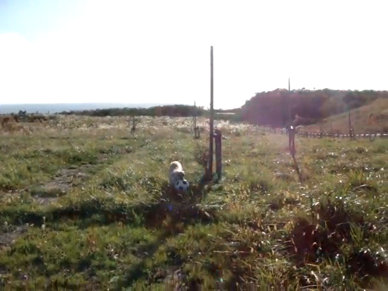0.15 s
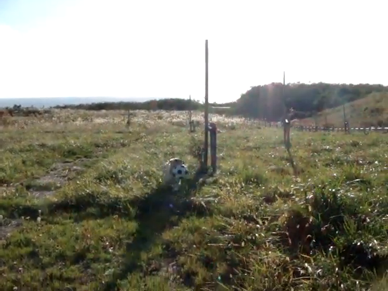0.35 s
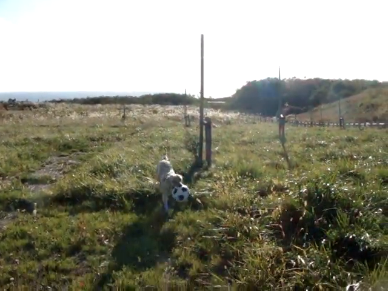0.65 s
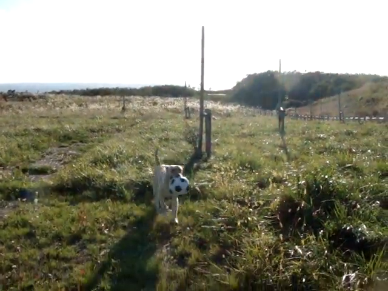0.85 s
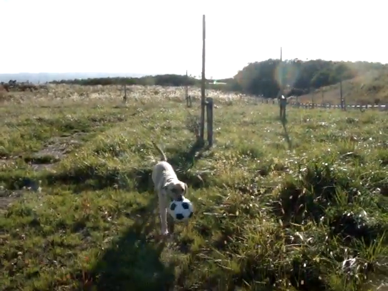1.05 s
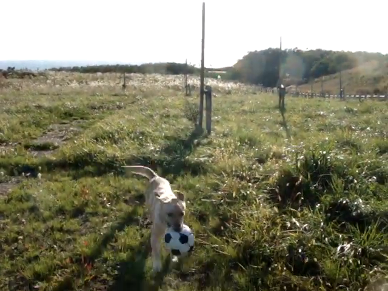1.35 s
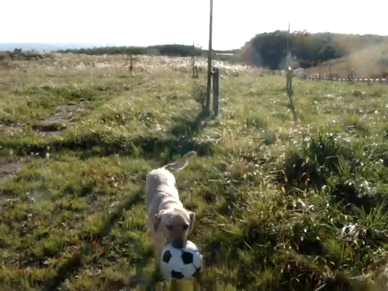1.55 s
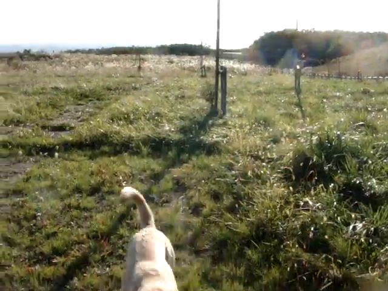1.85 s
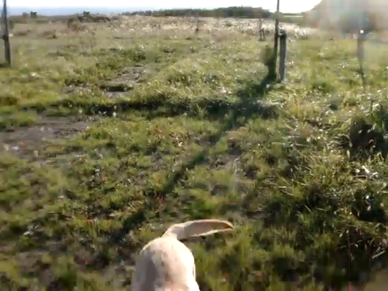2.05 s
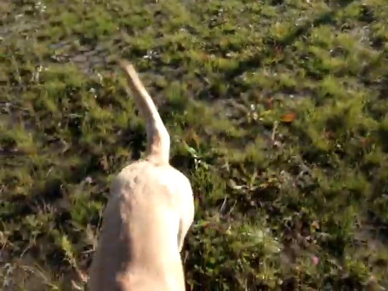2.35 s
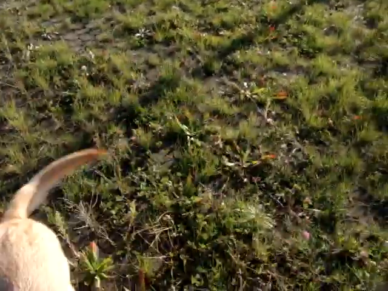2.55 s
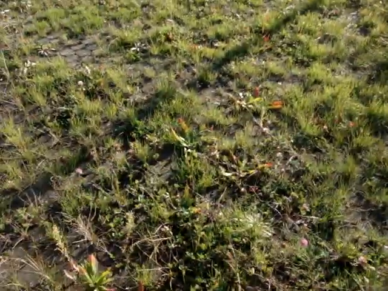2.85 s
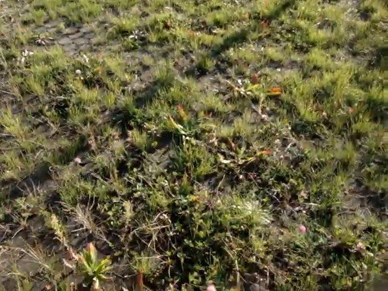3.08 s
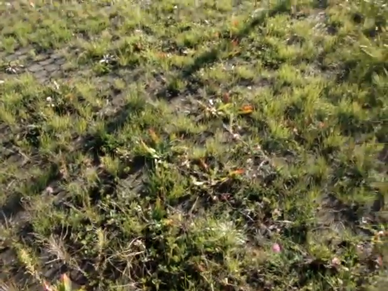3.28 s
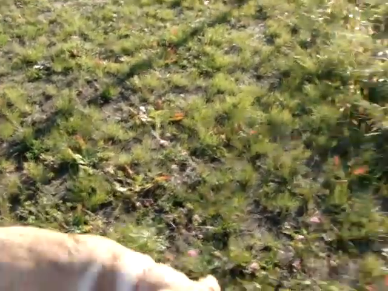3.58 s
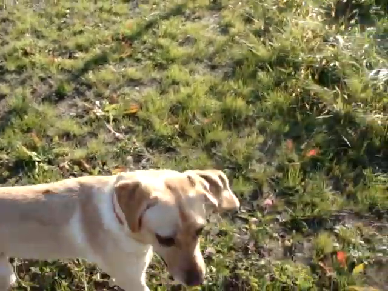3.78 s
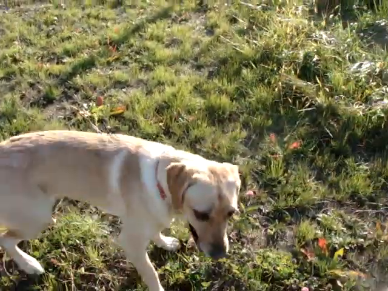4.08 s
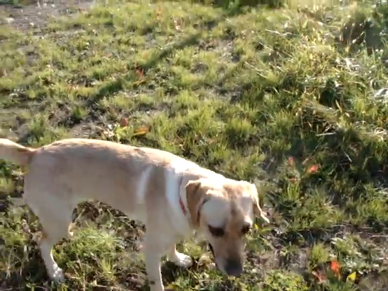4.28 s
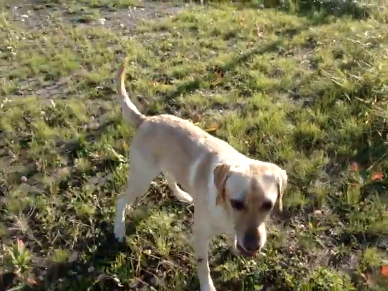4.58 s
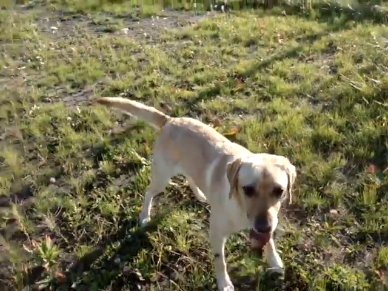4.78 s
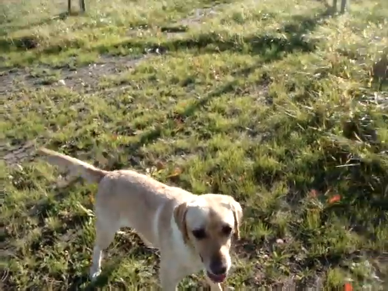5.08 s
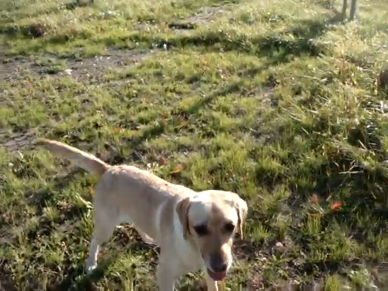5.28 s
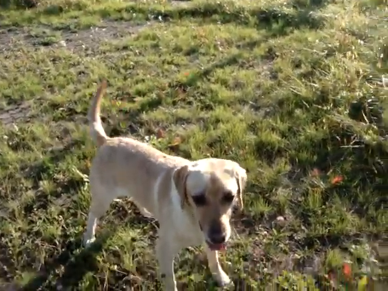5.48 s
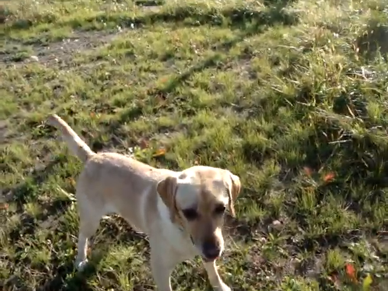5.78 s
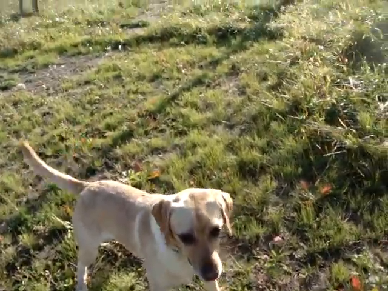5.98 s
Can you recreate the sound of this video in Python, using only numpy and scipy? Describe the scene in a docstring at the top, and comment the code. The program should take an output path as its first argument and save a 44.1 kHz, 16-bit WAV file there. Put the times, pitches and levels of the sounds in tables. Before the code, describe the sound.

Low wind buffeting opens the scene, then eases as a dog trots nearer, breathing around a ball. Its huffs turn rough and wet, with palate clicks, snorts and a fluttering sniff very close by. Dry grass rustles and crackles. Short hoarse pants follow at irregular spacing, strong then weak, between renewed gusts that rumble and finally overload the small outdoor microphone.

```python
"""A dog trots up through rough grass with a ball, passes close by, snorts and sniffs, then stands panting.
Each breath is turbulent air ringing the throat, mouth and nose, chopped unevenly by the soft palate.
Wet palate slaps and a gliding nostril whistle, made of narrow-band noise, colour the snorts and a sniff.
Gusts buffet the microphone with low rumble and pops: noise read at the pace of the wind, and short swirls.
Dry grass rustles under the paws as random ticks, stalks snap, and steady distant air lies underneath."""
import sys
import numpy as np
from scipy import signal
from scipy.fft import rfft, irfft
from scipy.io import wavfile
from scipy.ndimage import uniform_filter1d, map_coordinates

SR = 44100
rng = np.random.default_rng(int(sys.argv[2]) if len(sys.argv) > 2 else 0)


def persist_wave(psi):
    """Save psi, clipped to +-1, as 16-bit WAV."""
    counts = np.round(np.clip(psi, -1, 1) * 32767).astype(np.int16)
    wavfile.write(sys.argv[1], SR, np.atleast_2d(counts).T)


N = 270375
TIME = np.arange(N) / SR  # s
FREQ = np.fft.rfftfreq(N, 1 / SR)  # Hz
EDGE_HZ = 10130  # upper band limit


def amp(db):
    """Logarithmic level: decibels become a pressure gain."""
    return 10 ** (np.asarray(db) / 20)


def unit(x):
    """Power normalisation: scales to rms 1."""
    return x / np.sqrt(np.mean(x ** 2) + 1e-20)


def colour(points, hz):
    """Spectral shaping: gain interpolated in dB over logarithmic frequency."""
    f, db = np.transpose(points)
    return amp(np.interp(np.log(hz + 1), np.log(f), db))


def follow(rows, t):
    """Linear interpolation: reads a curve at the given times."""
    return np.interp(t, *np.transpose(rows))


def tint(x, gain):
    """Linear filtering: multiplies the spectrum by a gain for each frequency."""
    return irfft(rfft(x) * gain, len(x))


def wobble(n, rate_hz):
    """Band-limited random modulation: rms 1, up to about the given rate."""
    hz = np.fft.rfftfreq(n, 1 / SR)
    gain = hz / (hz + rate_hz / 4) / (1 + (hz / rate_hz) ** 4)
    return unit(tint(rng.standard_normal(n), gain))


def add(mix, s, sound):
    """Superposition: mixes a sound in at time s, or at the start if s is negative."""
    part = mix[max(round(s * SR), 0):][:len(sound)]
    part += sound[:len(part)]


def envelope(t, length, db, swell_db, attack, release):
    """Amplitude envelope: a soft attack, a hold that swells or sags, a soft release."""
    rise = np.clip(t / attack, 0, 1)
    fall = np.clip((length - t) / release, 0, 1)
    level_db = db + swell_db * (np.clip(t / length, 0, 1) - .5)
    return amp(level_db) * np.sin(np.pi / 2 * rise) ** 2 * np.sin(np.pi / 2 * fall) ** 2


# Spectrum of the steady air over the open field. Each row: frequency in Hz, relative density in dB per Hz.
FIELD_SPECTRUM = [(15, -41.5), (25, 1.5), (70, -1.5), (128, -3), (205, -8), (365, -11.5), (1130, -12),
                  (1530, -18), (2720, -17.5), (8600, -30.5), (10000, -75.5), (13000, -63), (22000, -120)]


def field(level_db=-43):
    """Stationary noise: steady distant air over open ground."""
    gain = colour(FIELD_SPECTRUM, FREQ) * (FREQ < EDGE_HZ)
    return amp(level_db) * unit(tint(rng.standard_normal(N), gain))


# Steady stirring of the grass. Each row: time in seconds, relative level in dB.
STIRRING = [(0, -47.5), (1.3, -55.5), (1.9, -48.5), (2.25, -61), (2.6, -47), (3.2, -50.5), (3.8, -41.5),
            (4.6, -49), (5.4, -45.5), (5.7, -56.5), (6.05, -55), (6.13, -39.5)]
# Paws and legs sweeping through the grass. Each row: start in seconds, length in seconds,
# relative level in dB, swell from start to end in dB.
SWISHES = [(0.273, 0.1, -48, -5), (0.437, 0.17, -44.5, 7), (1.423, 0.098, -51, -8), (1.842, .39, -44.5, 6),
           (2.267, 0.14, -39.5, -13), (2.452, 0.067, -40, -2), (2.794, 0.22, -41.5, 10),
           (3.059, 0.095, -39.5, -11), (3.341, 0.252, -37.5, 9.5), (4.270, 0.3, -46.5, -5),
           (4.778, 0.19, -47.5, -5), (4.923, 0.17, -37, 4), (5.362, 0.15, -50, 3)]


def stirring(attack_s=0.027, release_s=0.027):
    """Power addition: swishes add their power to the steady stirring, giving the gain of the rustle."""
    swishes = sum(envelope(TIME - start, length, db, swell_db, attack_s, release_s) ** 2
                  for start, length, db, swell_db in SWISHES)
    return np.sqrt(amp(follow(STIRRING, TIME)) ** 2 + swishes)


# Spectrum of brushing blades. Each row: frequency in Hz, relative density in dB per Hz.
BLADE_SPECTRUM = [(300, -17), (1000, 3.5), (2500, -1.5), (5000, -1.5), (7000, -1), (10000, -3)]
# Dry stalks that snap. Each row: time in seconds, relative level in dB.
SNAPS = [(1.893, -21), (2.635, -24.5), (2.9743, -28), (3.3135, -24.5), (3.4147, -25), (3.6894, -43),
         (3.813, -20.5), (5.4187, -28)]


def grass(grass_db=2, ticks_per_s=1200, spread_db=8.0, soft_db=0, snap_db=-1, snap_decay_s=0.014, crisp_hz=6000):
    """Random impulses: blades tick at chance moments over a soft brush, and stalks snap as decaying noise."""
    sizes = amp(spread_db * np.minimum(rng.exponential(1, N), 3)) * rng.choice([-1, 1], N)
    ticks = sizes * (rng.random(N) < ticks_per_s / SR)
    brushing = unit(ticks) + amp(soft_db) * rng.standard_normal(N)
    rustle = unit(tint(brushing, colour(BLADE_SPECTRUM, FREQ) * (FREQ < EDGE_HZ)))
    snaps, t = np.zeros(N), np.arange(SR // 50) / SR
    for s, db in SNAPS:
        add(snaps, s, amp(db + snap_db) * np.exp(-t / snap_decay_s) * rng.standard_normal(len(t)))
    crisp_snaps = tint(snaps, FREQ / np.hypot(FREQ, crisp_hz))
    return rustle * amp(grass_db) * stirring() + crisp_snaps


# The light breeze between gusts. Each row: time in seconds, level in dB.
BREEZE = [(0, -35), (.8, -39), (1.3, -41), (1.53, -49), (1.85, -44), (2.24, -49), (2.4, -37.5), (3.5, -39),
          (4.1, -52), (4.5, -52), (4.8, -42), (5.45, -42), (6.1, -36.5)]
# Gusts. Each row: start in seconds, length in seconds, level in dB, swell from start to end in dB,
# factor on the pace of the eddies.
GUSTS = [(0.000, 0.086, -17, 6.5, 1.09), (0.090, 0.12, -22, 6, 0.93), (0.177, 0.098, -24.5, -5.5, .9),
         (0.305, 0.13, -29.5, 2, 0.95), (0.439, .100, -23.5, -1.5, 1.2), (0.529, 0.087, -26, -2, 1),
         (0.657, 0.088, -37, -0.5, .8), (0.801, 0.06, -32.5, 3.5, .8), (0.872, 0.13, -29.5, -0.5, .85),
         (1.034, .150, -31, 0, 0.74), (1.199, 0.068, -27.5, -8.5, 0.73), (1.863, 0.062, -35, -1, 1.22),
         (2.400, 0.14, -23.5, -8, 1.21), (2.546, 0.11, -19.5, 1, 1.12), (2.65, .168, -19.5, -1.5, 1.15),
         (2.837, 0.22, -28, 3.5, 1.09), (3.087, 0.12, -22.5, 1, 1.14), (3.191, 0.17, -17.5, -0.5, 1.49),
         (3.334, .160, -20.5, -3, 1.15), (3.540, 0.11, -35, 1, 0.97), (3.698, 0.068, -36, -3, 1.14),
         (4.577, 0.0402, -32.5, 1, .8), (4.665, 0.089, -21, -1.5, 0.84), (4.810, .110, -21, 1, 0.67),
         (4.899, 0.15, -21, 1.5, 1.05), (5.022, .200, -23.5, -0.5, .95), (5.284, 0.06, -31.5, -4, .8),
         (5.368, 0.067, -32.5, -3, .8), (5.559, .090, -33.5, -3.5, .8), (5.663, 0.1194, -33.5, -1.5, 0.65),
         (5.805, 0.086, -25, -0.5, .55), (5.937, .090, -20.5, 3, .7), (6.011, .140, -12.5, 10, 0.63)]


def gusting(breeze_pace=1.0, attack_s=.012, release_s=.022):
    """Power-weighted mean: gusts add to the breeze (level in dB), and the strongest dominates the pace."""
    power = amp(follow(BREEZE, TIME)) ** 2
    paced = breeze_pace * power
    for start, length, db, swell_db, pace in GUSTS:
        gust = envelope(TIME - start, length, db, swell_db, attack_s, release_s) ** 2
        power, paced = power + gust, paced + pace * gust
    return 10 * np.log10(power), paced / power


# Spectrum of the eddies at unit speed. Each row: frequency in Hz, relative density in dB per Hz.
BUFFET_SPECTRUM = [(20, -25), (50, -8.5), (100, 1), (200, -1), (300, -8), (450, -11.5), (700, -19.5),
                   (1200, -35), (2500, -58), (5000, -90)]


def wind(wind_db=0, lumpy_db=3.0, lump_hz=42, speed_per_db=0.28, lump_speed_per_db=0.46, usual_db=-23,
         thin_hz=55, top_hz=1150):
    """Frozen turbulence: eddies swept over the microphone; faster air is louder and brighter."""
    gust_db, pace = gusting()
    lumps_db = lumpy_db * np.clip(wobble(N, lump_hz), -2, 2)
    speed = pace * amp(speed_per_db * (gust_db - usual_db) + lump_speed_per_db * lumps_db)
    size = 2 ** 19
    spectrum = colour(BUFFET_SPECTRUM, np.fft.rfftfreq(size, 1 / SR))
    eddies = unit(tint(rng.standard_normal(size), spectrum))
    pressure = map_coordinates(eddies, [np.cumsum(speed)], order=1, mode="wrap") * amp(lumps_db)
    # the small capsule loses the deep bass, and the finest eddies cancel across its opening
    pressure = tint(pressure, FREQ / np.hypot(FREQ, thin_hz) / np.hypot(1, (FREQ / top_hz) ** 3))
    # a running rms over 1400 samples evens the level, so that gust_db alone sets it
    pressure /= np.sqrt(uniform_filter1d(pressure ** 2, size=1400) + 1e-9)
    return amp(wind_db + gust_db) * pressure


# The strongest single eddies that hit the microphone. Each row: time in seconds, relative level in dB,
# centre frequency in Hz, duration of the swirl in cycles.
EDDIES = [(.030, 2.5, 249, .5), (.033, -4, 880, 1.2), (.051, -5.5, 630, 0.8), (0.162, -4.5, 300, 0.68),
          (0.403, -6.5, 192, 0.41), (0.437, -9.5, 169, 0.86), (.451, -19, 398.5, 1.03),
          (.520, -12, 440, 1.1), (.625, -6, 190, 0.62), (.913, -6.5, 216, 0.74), (1.215, -13, 147.4, 0.65),
          (2.366, -17.5, 172, 0.79), (2.407, -6, 213.3, 1.25), (2.600, -8.5, 240, 2.8),
          (2.696, -6.5, 295, 0.98), (2.715, -9, 231.2, 0.77), (2.805, -6.5, 197, 0.58),
          (3.103, -8.5, 400, 0.78), (3.21, -6.5, 323, 1.93), (3.309, -7, 367, 3.6),
          (4.691, -7.5, 232, 0.57), (4.718, -3.5, 160.1, 0.78), (4.759, -4, 182.9, 0.64),
          (4.941, -3, 206, 0.65), (4.981, -6, 340, .6), (5.167, -9, 338.2, 0.52), (5.186, -12, 146, 1),
          (5.204, -9.5, 330.8, 0.44), (5.511, -13, 244.1, 0.54), (5.618, -11, 284.2, 0.44),
          (5.697, -10.5, 183.5, 0.65), (5.8, -7.5, 206.3, 0.46), (5.9, -10.5, 140.7, 0.54),
          (5.984, -1.5, 260.4, 0.53), (5.999, -3, 345.4, 0.67), (6.0932, 6.5, 643.8, 0.53),
          (6.109, -3.5, 404, 0.71), (6.121, -3, 259, 0.42)]


def pops(pop_db=-2, steepen=0.38, core=3.7, top_hz=1320):
    """Vortex passage: an eddy pushes and pulls the pressure, with its phase bent as the narrow core passes."""
    out, t = np.zeros(N), np.arange(-SR // 30, SR // 30) / SR
    for (s, db, hz, cycles), phase in zip(EDDIES, rng.random(len(EDDIES))):
        turn = 2 * np.pi * hz * t
        swirl = np.sin(turn + steepen * np.tanh(core * turn) + 2 * np.pi * phase)
        add(out, s + t[0], amp(db) * swirl / np.cosh(2 * hz * t / cycles))
    # the finest detail of an eddy cancels across the capsule
    return amp(pop_db) * tint(out, 1 / np.hypot(1, (FREQ / top_hz) ** 3))


# The faint nostril whistle of the long sniff, mostly sinking in pitch as the nostrils widen.
# Each row: time in seconds, centre frequency in Hz, relative level in dB.
NOSTRILS = [(2.701, 7600, -65), (2.72, 7480, -37), (2.76, 7100, -41), (2.80, 6400, -40), (2.836, 6320, -36),
            (2.882, 6370, -30.5), (2.895, 6040, -55)]


def nostrils(width_hz=650, whistle_db=-2, flutter_db=5.0, flutter_hz=130):
    """Narrow-band noise: turbulence in a narrow opening gives a fuzzy, fluttering, gliding whistle."""
    s, hz, db = np.transpose(NOSTRILS)
    t = np.arange(s[0], s[-1], 1 / SR)
    turn = 2 * np.pi * np.cumsum(np.interp(t, s, hz)) / SR
    fuzz = wobble(len(t), width_hz) * np.cos(turn) + wobble(len(t), width_hz) * np.sin(turn)
    level_db = whistle_db + np.interp(t, s, db) + flutter_db * wobble(len(t), flutter_hz)
    return s[0], fuzz * amp(level_db)


def slap(db, hz, rise_s=0.0017, rasp_db=-16, rasp_hz=3000):
    """Impulsive excitation: the palate slaps open in a few cycles of throat resonance and a wet rasp."""
    t = np.arange(SR // 40) / SR
    swell = (t / rise_s) ** 2 * np.exp(2 * (1 - t / rise_s))
    lowpass = 1 / (1 + (np.fft.rfftfreq(len(t), 1 / SR) / rasp_hz) ** 4)
    rasp = unit(tint(rng.standard_normal(len(t)), lowpass))
    return amp(db) * swell * (np.sin(2 * np.pi * hz * t) + amp(rasp_db) * rasp)


# Broad colour of rushing air under the resonances. Each row: frequency in Hz, relative density in dB per Hz.
RUSH_SPECTRUM = [(100, -30), (350, -30), (520, -0.5), (720, 2.5), (1100, 1.5), (1600, -6), (2400, 0),
                 (3250, 0.5), (3700, -4), (4500, -6.5), (6000, -8), (10000, -18.5)]


def airway(posture, hz, widen=0.93, rush_db=-15, low_hz=400):
    """Acoustic resonance: steep peaks, cut off in the bass, over a broad rush."""
    power = sum(amp(db) ** 2 / (1 + ((hz - f) / (widen * width + 30)) ** 2) ** 2 for f, width, db in posture)
    bass_cut = hz ** 8 / (hz ** 8 + low_hz ** 8)
    rush = amp(rush_db) * colour(RUSH_SPECTRUM, hz)
    return np.sqrt(power * bass_cut + rush ** 2)


# Spectrum of the hiss at the teeth and nostrils. Each row: frequency in Hz, relative density in dB per Hz.
HISS_SPECTRUM = [(1000, -42), (3000, -10.5), (4200, 17.5), (6000, 17), (8000, 19.5), (10000, 16.5)]


def breath(start, length, effort_db, swell_db, posture, flutter_db, hiss_db, flutter_hz=110, hiss_flutter=1.0,
           drift=.02, drift_hz=9, attack_s=0.023, release_s=0.052, arch_db=6):
    """Source and filter: turbulence, chopped unevenly by the palate, rings the airway and hisses."""
    size = 2 ** 14
    t, hz = np.arange(size) / SR, np.fft.rfftfreq(size, 1 / SR)
    chop_db = flutter_db * np.clip(wobble(size, flutter_hz), -2, 2)
    throat = tint(rng.standard_normal(size) * amp(chop_db), airway(posture, hz))
    # jaw and tongue keep moving, so all the resonances slide a little together
    throat = map_coordinates(throat, [np.cumsum(1 + drift * wobble(size, drift_hz))], order=3, mode="wrap")
    hiss_gain = colour(HISS_SPECTRUM, hz) * (hz < EDGE_HZ)
    hiss = tint(rng.standard_normal(size) * amp(hiss_flutter * chop_db), hiss_gain)
    # effort and hiss are levelled against the throat's sound in the presence band
    presence = (hz > 2000) & (hz < 3600)
    air = throat / tint(throat, presence).std() + amp(hiss_db) * unit(hiss)
    # the arch is highest midway
    bend_db = -arch_db * (2 * np.minimum(t / length, 1) - 1) ** 2
    return start, air * envelope(t, length, effort_db + bend_db, swell_db, attack_s, release_s)


# Postures of the airway, as resonances. Each row: frequency in Hz, nominal width in Hz, relative level in dB.
AROUND_BALL = [(1004, 125, 3.5), (1950, 100, -6), (2720, 86, -9.5), (3210, 25, -24), (3670, 45, -9),
               (4050, 21, -10)]
DRAWING_IN = [(1150, 78, -5.5), (2370, 530, -9), (3200, 510, -9), (4160, 67, -19), (4680, 88, -12),
              (6150, 56, -30), (6900, 270, -38)]
BALL_DROPPED = [(612, 24, 1), (1063, 116, -3), (1420, 30, -8), (2010, 71, -9), (2900, 55, -10),
                (3630, 99, -16), (3990, 42, -17), (6050, 200, -27)]
GASPING = [(570, 50, -4.5), (1086, 91, -3), (2048, 79, -6), (2430, 310, -9.5), (2740, 26, -21),
           (3400, 220, -9.5), (4880, 92, -17)]
HUFFING = [(540, 52, -2.5), (1040, 84, 3), (1439, 66, -7.5), (1940, 54, -7.5), (2650, 73, -9.5),
           (2950, 120, -10.5), (3670, 80, -11), (5100, 56, -17), (6100, 120, -18)]
SNORTING = [(710, 112, -1), (1160, 79, 5), (1880, 160, -3), (2400, 81, 0.5), (3100, 39.2, 0),
            (3550, 127, -4), (4900, 79, -19)]
BLOWING = [(661.5, 33, -3.5), (1015, 77, 1), (1360, 48, -5), (1730, 260, -11.5), (2790, 44.7, -7),
           (3850, 38, -11), (4200, 62, -14), (6130, 220, -34), (7014, 80, -21)]
SNIFFING = [(887, 250, -2), (1165, 28, 0.5), (1940, 42, -11.5), (2880, 68, -6), (3500, 76, -18),
            (3590, 42, -9)]
NOSE_FLARED = [(624, 17, 2), (910, 25, 0), (1152, 30, -5), (3260, 115, -2), (3920, 37, -5.5)]
SIGHING = [(529, 46, 4.5), (950, 150, 1), (1440, 165, -0.5), (2110, 25, -4.5), (3095, 97, -11),
           (3803, 42, -16), (5200, 86, -25), (6860, 140, -21)]
MOUTH_OPENING = [(544, 38.7, 1.5), (975.4, 23, 4), (1336, 86, 0), (2010, 130, -8), (2501, 93, -8.5),
                 (3080, 68, -6), (4290, 45, -16), (5500, 74, -23)]
MOUTH_WIDE = [(484, 27, -7), (1034, 190, -2), (1377, 30, -0.5), (1684, 80, -4.5), (1984, 80, -6),
              (2357, 113, -7.5), (2772, 17, 0), (3080, 135, -5.5), (5450, 710, -15)]
TONGUE_OUT = [(484, 81, -4), (939, 61, 4.5), (1360, 103, 3), (1878, 137, -4.5), (2286, 70, 1),
              (2836, 190, -1), (3284, 41, -7), (4810, 130, -12), (6890, 58, -16)]
LIPS_BACK = [(896, 21, -3), (1213, 70, 2), (1540, 133, -7.5), (2094, 167, -7.5), (2440, 159, -5.5),
             (2990, 50, -1.5), (3500, 100, -34), (4450, 81, -31)]
EASING = [(880, 420, -10.5), (1220, 160, -1), (2055, 340, -7), (2380, 140, -6.5), (2840, 65, -1.5),
          (3300, 31, -17), (3660, 82, -31), (3910, 41, -30)]
# The breaths. Each row: start in seconds, length in seconds, relative effort in dB, swell from start to end
# in dB, airway posture, palate flutter in dB, relative hiss at the teeth and nostrils in dB.
BREATHS = [ (0.292, 0.17, -55.5, -5, AROUND_BALL, -1, -18), (0.722, 0.23, -52, -8, AROUND_BALL, 3.5, -1),
           (1.004, .15, -52.5, -6, AROUND_BALL, 2.5, 1), (1.17, 0.18, -45.5, 1, AROUND_BALL, 0.3, -26),
           (1.413, 0.19, -38.5, -6, DRAWING_IN, 4, -30), (1.62, 0.18, -38, -1.5, BALL_DROPPED, 1.6, -32),
           (1.820, 0.25, -35, -1.5, GASPING, 3.5, -13), (2.057, 0.18, -33.5, -13, HUFFING, 2.3, -32.5),
           (2.263, 0.064, -33.5, 3.5, AROUND_BALL, -5, -14), (2.294, 0.097, -29.5, -11, SNORTING, 3, -26),
           (2.398, 0.097, -37.5, -7, DRAWING_IN, 0, -7.5), (2.488, 0.17, -30.5, -4, BLOWING, 2.5, -13),
           (2.693, 0.25, -33.5, 6.5, SNIFFING, 3, -24), (2.853, 0.11, -24, -12, NOSE_FLARED, 3.5, -17.5),
           (2.917, 0.11, -37, -4, NOSE_FLARED, 8.5, -13), (3.022, 0.18, -37.5, -10, SIGHING, 2.3, -16),
           (3.229, 0.19, -42, -8, DRAWING_IN, 2, -23), (3.410, 0.19, -36, 6.5, MOUTH_OPENING, 1.3, -14),
           (3.609, 0.12, -42, -16, EASING, 3, -5), (3.812, 0.16, -28, -3, MOUTH_WIDE, 1.2, -9),
           (3.990, 0.087, -33.5, -2, LIPS_BACK, 3, -10), (4.12, .12, -44, -2, EASING, 2.2, -17),
           (4.286, 0.21, -33, -10, TONGUE_OUT, 0.9, -17), (4.505, 0.26, -41.5, -7.5, EASING, 1.9, -27),
           (4.757, 0.2, -31, 1, LIPS_BACK, 1.2, -15.5), (4.967, 0.29, -43.5, -7, EASING, 3, -23),
           (5.25, .23, -38, -7, EASING, 0, -25), (5.505, 0.12, -41.5, 4, EASING, 3.5, -17)]
# Slaps of the soft palate. Each row: time in seconds, peak level of the ring in dB, ring frequency in Hz.
SLAPS = [(1.871, -19, 1080), (1.889, -19.5, 1125), (1.937, -24, 1096), (2.072, -18.5, 1005),
         (2.105, -14, 1010), (2.12, -14, 1030), (2.284, -6.5, 1050), (2.317, -15, 1164), (2.332, -9.5, 813),
         (2.847, -9, 882), (2.877, -15, 780)]


def dog(breath_db=1.5, slap_db=0):
    """Superposition of sources: all the breaths, the nostril whistle and the palate slaps."""
    air, slaps = np.zeros(N), np.zeros(N)
    for row in BREATHS:
        add(air, *breath(*row))
    add(air, *nostrils())
    for s, db, hz in SLAPS:
        add(slaps, s, slap(db, hz))
    return amp(breath_db) * air + amp(slap_db) * slaps


def scene():
    """Free field: air, grass, wind and dog add up in the open, with no echo."""
    return (field() + grass() + wind() + pops() + dog())[None]


def record(dry):
    """Saturation: the microphone overloads softly on the hardest gusts; then soft ends and the band limit."""
    squashed = dry / (1 + dry ** 8) ** (1 / 8)
    ends = np.minimum(np.minimum(TIME, TIME[-1] - TIME) / .003, 1)  # 3 ms fades
    lowpass = signal.firwin(511, EDGE_HZ, window=("kaiser", 8), fs=SR)
    return signal.oaconvolve(squashed * ends, lowpass[None], "same")


dry = scene()
out = record(dry)
persist_wave(out)
```